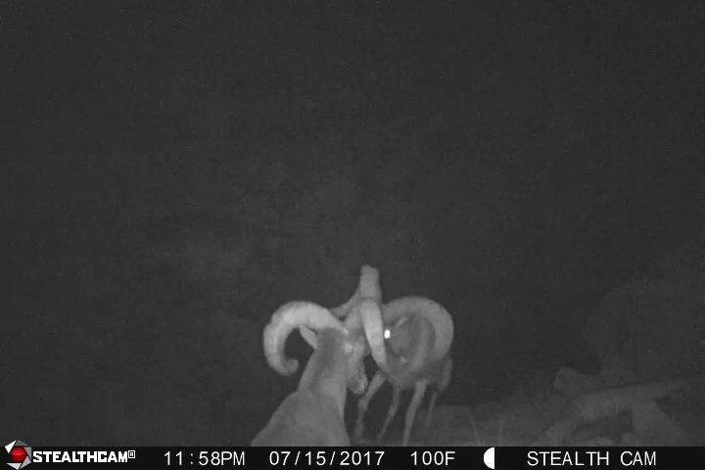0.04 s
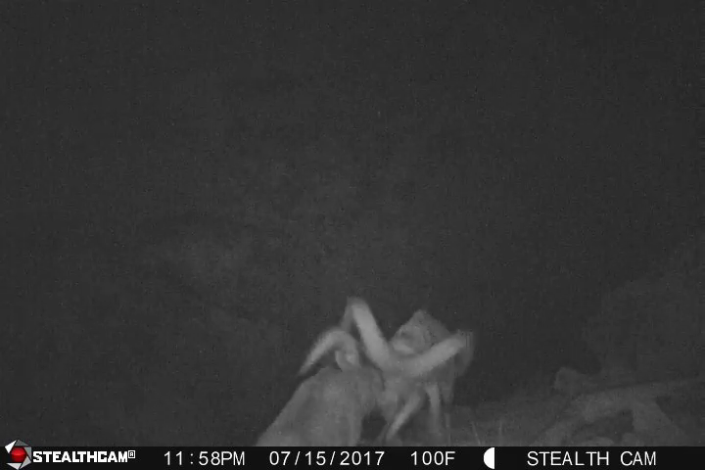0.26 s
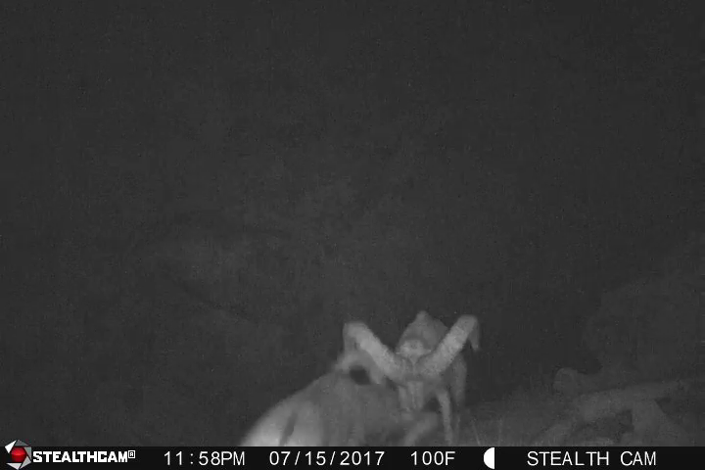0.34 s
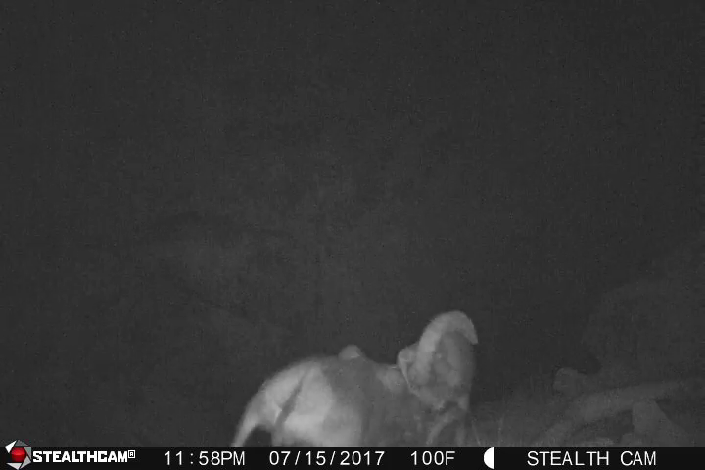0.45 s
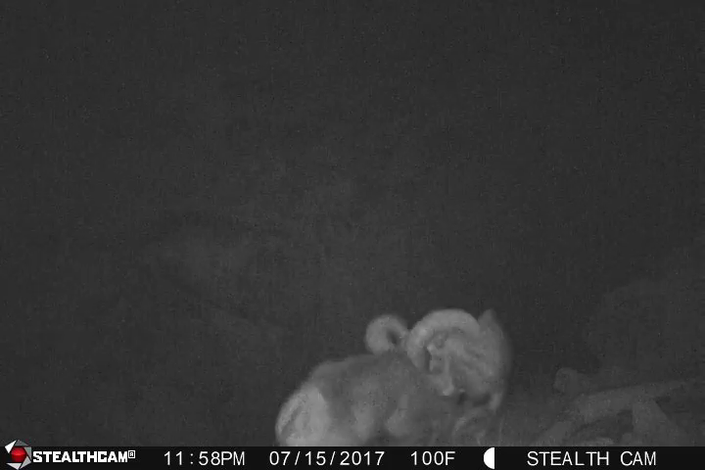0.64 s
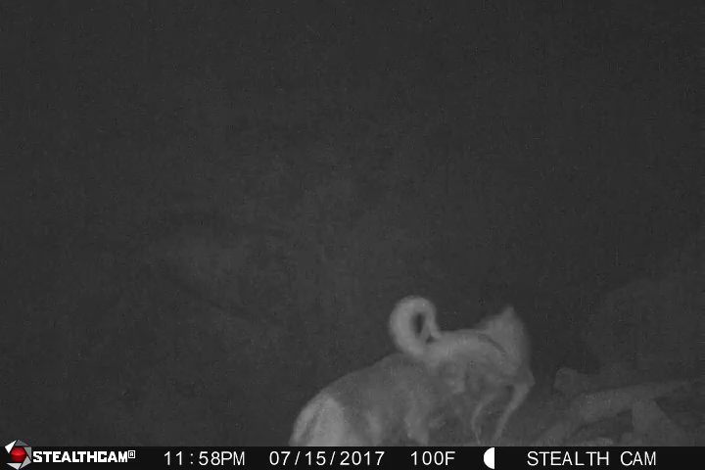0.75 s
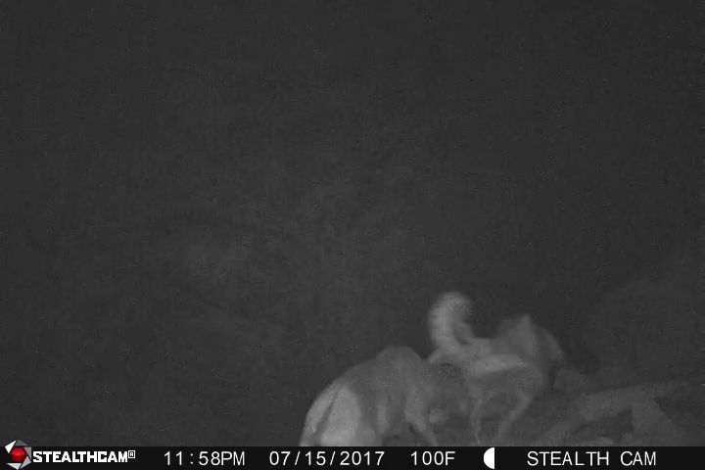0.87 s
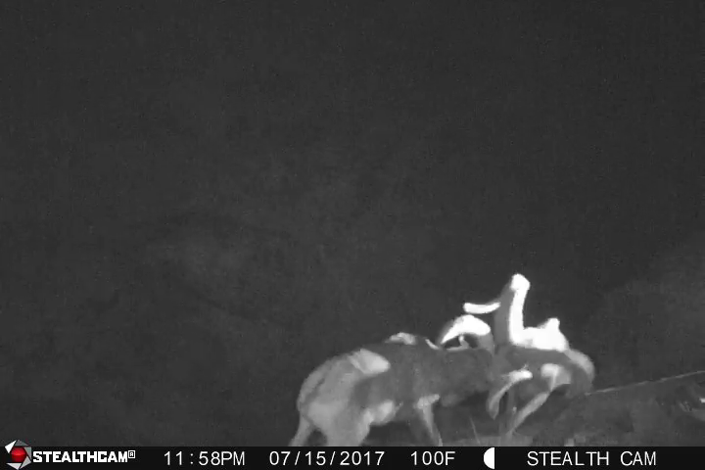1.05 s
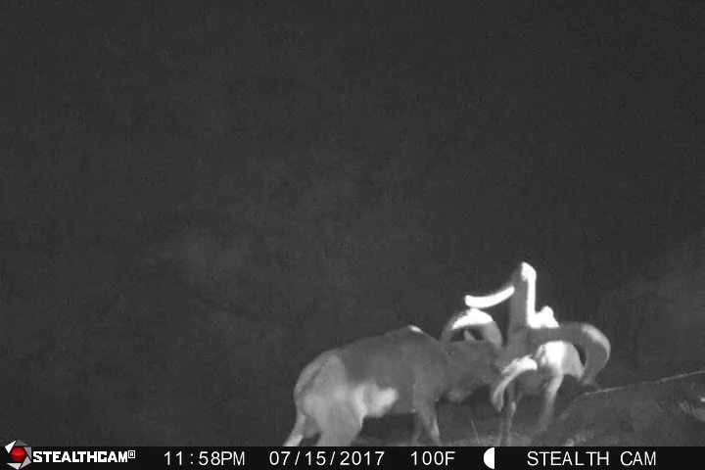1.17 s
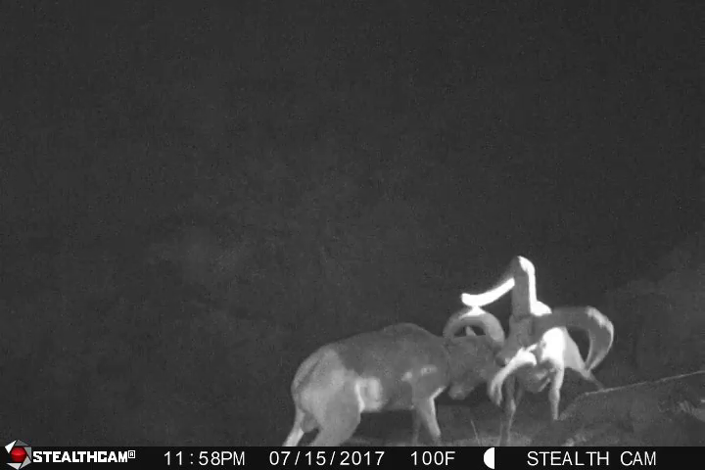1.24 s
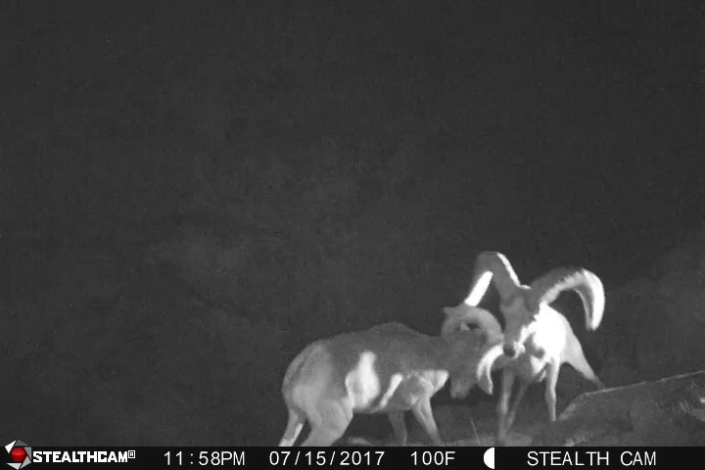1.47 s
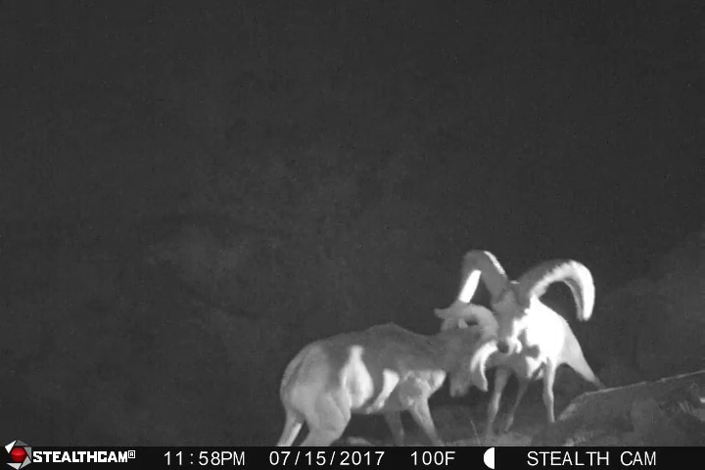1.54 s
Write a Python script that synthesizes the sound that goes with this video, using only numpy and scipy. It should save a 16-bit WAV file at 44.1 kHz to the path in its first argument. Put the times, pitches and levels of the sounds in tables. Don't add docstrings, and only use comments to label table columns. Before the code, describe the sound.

Two rams clash horns in a loud hollow double crack with quick weaker rebounds and a short rattling tail, then hooves knock and scrape on rocky ground; quiet night outdoors, small muffled, overloaded microphone.

```python
import sys
import numpy as np
from scipy import signal
from scipy.io import wavfile

SR = 44100
rng = np.random.default_rng(int(sys.argv[2]) if len(sys.argv) > 2 else 0)


def pcm_store(signal):
    levels = np.round(np.clip(np.atleast_2d(signal), -1, 1) * 32767)
    wavfile.write(sys.argv[1], SR, levels.astype(np.int16).T)


def nominal_scale(level):
    x = np.asarray(level, float) / 20
    return 10 ** x


N = 70560


def evened(x):
    return x / np.sqrt(np.mean(x ** 2) + 1e-20)


def add(mix, start_s, sound):
    part = mix[round(start_s * SR):][:len(sound)]
    part += sound[:len(part)]


def colour(x, points):
    hz, level_db = np.transpose(points)
    bins_hz = np.fft.rfftfreq(8192, 1 / SR)
    drawn_db = np.interp(np.log(bins_hz + 1), np.log(hz), np.maximum(level_db, -70))
    log_gain = np.log(nominal_scale(drawn_db))
    mirrored = np.concatenate([log_gain, log_gain[-2:0:-1]])
    taps = np.fft.ifft(np.exp(np.conj(signal.hilbert(mirrored)))).real[:4096]
    return evened(signal.fftconvolve(x, taps)[:len(x)])


def grit(per_s, spread_db, wash):
    strength = nominal_scale(spread_db * np.minimum(rng.exponential(1, N), 4))
    clicks = strength * rng.choice([-1., 1.], N) * (rng.random(N) < per_s / SR)
    return evened(clicks) + wash * rng.standard_normal(N)


def curve(rows):
    start_s, level_db = np.transpose(rows)
    return nominal_scale(np.interp(np.arange(N) / SR, start_s, level_db))


def ring(hz, t60, rise_s, phase=0., full=0.99):
    t = np.arange(round(SR * .6)) / SR
    rise = 1 - np.exp(-t / max(rise_s, 1e-5))
    fade = nominal_scale(-60 * (t / t60) ** full)
    return rise * fade * np.sin(2 * np.pi * hz * t + phase)


def band_noise(noise, low_hz, high_hz):
    return evened(signal.lfilter(*signal.butter(1, [low_hz, high_hz], "bandpass", fs=SR), noise))


def night_air():
    # pitch_hz [Hz], level_db [dB]
    night_spectrum = [(12, -35.5), (20, 2), (32, -26.5), (80, -17.5), (355, -34.5), (506, -34.5),
                      (687, -50.5), (2450, -46.5), (5600, -45), (7280, -80), (12300, -120)]
    return nominal_scale(-60) * colour(rng.standard_normal(N), night_spectrum)


def far_steps():
    out = np.zeros(N)
    # start_s [s], level_db [dB], pitch_hz [Hz]
    steps = [
        (0.929, -46, 131.7),
        (0.968, -45, 135),
        (1.01, -45.5, 145.6),
    ]
    for start_s, level_db, hz in steps:
        add(out, start_s, nominal_scale(level_db) * ring(hz, 0.19, 0.0072))
    return out


def trample():
    # pitch_hz [Hz], level_db [dB]
    ground_spectrum = [(24, -39), (40, -8.5), (152, -3.5), (348, -5.5), (626, -6), (745, -10), (982, -18.5),
                       (2500, -32), (3250, -59), (5500, -120)]
    # start_s [s], level_db [dB]
    weight = [(.07, -52), (.15, -61), (.2, -63.5), (.45, -57.5), (.555, -51.5), (.565, -37), (.63, -35),
              (.68, -40.5), (.7, -45.5), (.73, -45), (.75, -54), (.8, -57), (.82, -49), (.86, -50.5),
              (1.0, -57), (1.1, -66)]
    rows = [(0, -75)] + list(weight) + [(1.25, -80)]
    return colour(grit(per_s=1200, spread_db=4.5, wash=0.6), ground_spectrum) * curve(rows)


def gravel():
    # pitch_hz [Hz], level_db [dB]
    gravel_spectrum = [(59, -34), (100, -6), (398, -1.5), (781, -6.5), (1190, -6), (1780, -6.5),
                       (2040, -8.5), (5600, -13), (7280, -47.5), (12300, -120)]
    # start_s [s], level_db [dB]
    effort = [(0, -51.5), (.065, -51.5), (.2, -56.5), (.4, -51.5), (.52, -63), (.54, -43), (.72, -50),
              (.735, -57.5), (.795, -58.5), (.9, -43.5), (.92, -50.5), (1.1, -66), (1.29, -66.5),
              (1.305, -52), (1.32, -65.5), (1.44, -63.5), (1.565, -73.5), (1.575, -55)]
    # pitch_hz [Hz], level_db [dB], t60_s (time to fade by 60 dB) [s]
    slab = [(506, -48.5, 1.25), (410, -43, 0.6), (1500, -40.5, 0.37), (2700, -47.5, 0.49)]
    slide_s, slide_db, hold_s, slide_t60_s = .803, -31, .016, 0.13

    out = colour(grit(per_s=2500, spread_db=1.5, wash=0.6), gravel_spectrum) * curve(effort)
    t = np.arange(N) / SR - slide_s
    slide = (t > 0) * nominal_scale(slide_db - 60 * np.maximum(t - hold_s, 0) / slide_t60_s)
    sliding_grit = grit(per_s=5000, spread_db=-4.0, wash=0.52) * slide + 1e-9
    out += colour(sliding_grit, gravel_spectrum) * np.sqrt(np.mean(slide ** 2))
    for hz, level_db, t60 in slab:
        add(out, slide_s, nominal_scale(level_db) * ring(hz, t60, 0.0068))
    return out


def thuds():
    out = np.zeros(N)
    # start_s [s], level_db [dB], pitch_hz [Hz]
    stamps = [(.217, -12, 269.8), (0.2209, -16, 435), (.242, -17.5, 290), (.3, -24, 332), (0.223, -16, 135),
              (0.29, -29.5, 141.4), (0.722, -31, 88.5), (0.737, -32.5, 100), (0.745, -35, 111),
              (.760, -31, 84.5), (0.771, -37, 128), (0.81, -32.5, 83)]
    for start_s, level_db, hz in stamps:
        add(out, start_s, nominal_scale(level_db) * ring(hz, 0.057, 0.0014))
    return out


def stone_knocks():
    # start_s [s], level_db [dB], pitch_hz [Hz], t60_s [s]
    knocks = [(.002, -26.5, 905, 0.02), (.0068, -23.5, 842, 0.036), (.016, -33.5, 562, 0.035),
              (.023, -25.5, 985, 0.011), (0.038, -30.5, 800, 0.02), (0.0413, -21, 1214, 0.0071),
              (0.047, -18.5, 980, 0.017), (0.0545, -14, 936, 0.011), (.060, -28.5, 560, 0.014),
              (.108, -41, 460, .02), (.122, -37.5, 604, 0.017), (.14, -40.5, 560, .015),
              (0.091, -37.5, 1294, 0.017), (0.1597, -23.5, 2370, 0.007), (0.186, -31, 860, 0.015),
              (0.194, -37.5, 840, 0.0088), (0.501, -30.5, 3360, 0.015), (.526, -27.5, 2700, 0.0057),
              (.534, -30.5, 920, 0.0071), (0.5874, -21, 1420, 0.0081), (0.673, -32.5, 1180, 0.0093),
              (.8036, -25.5, 1230, .01), (0.8127, -23.5, 1500, 0.0087), (0.8153, -21, 2200, 0.01),
              (.824, -32, 920, 0.014), (.836, -31.5, 497, 0.01), (0.888, -43, 1540, 0.011),
              (0.8992, -26.5, 3040, 0.006), (.908, -36, 4800, .008), (.960, -36, 845, 0.032),
              (1.036, -41.5, 1605, 0.017), (1.098, -45.5, 2810, 0.014), (1.212, -46, 2035, 0.013),
              (1.275, -44, 1270, 0.022), (1.293, -36.5, 1710, 0.019), (1.300, -32.5, 2030, 0.011),
              (1.408, -52, 1200, .012), (1.425, -49.5, 849, .02), (1.44, -50, 1000, .015),
              (1.064, -46.5, 3200, .01), (.775, -40, 1100, .012), (1.433, -52, 900, .012),
              (1.47, -50, 1300, 0.014), (1.460, -36.5, 1297, 0.0085), (1.572, -45, 986, .02),
              (1.597, -38, 1500, 0.015)]
    tick_db, chatter_db, swing_db, after_db = -0.5, -15, 6, -15.5
    swing_cycles = 2.26
    out, t = np.zeros(N), np.arange(2000) / SR
    noise = rng.standard_normal((len(knocks), 2, len(t)))
    for (start_s, level_db, hz, t60), (tick_noise, chatter_noise) in zip(knocks, noise):
        bright = signal.lfilter(*signal.butter(1, 1500, "highpass", fs=SR), tick_noise)
        tick = nominal_scale(tick_db - 60 * t / 0.0053) * bright
        rough = band_noise(chatter_noise, hz * 0.33, min(hz * 4.5, 9000))
        chatter = nominal_scale(chatter_db - 60 * t / (3.6 * t60)) * rough
        swing = ring(hz, swing_cycles / hz, 0.0003, full=1.68)
        swing += nominal_scale(after_db) * ring(hz, 1.2 * t60, 0.0013)
        add(out, start_s, nominal_scale(level_db) * (tick + chatter - nominal_scale(swing_db) * swing[:len(t)]))
    return signal.lfilter(*signal.butter(2, 300, "highpass", fs=SR), out)


def hillside_rattle(start_s):
    # pitch_hz [Hz], level_db [dB]
    rattle_spectrum = [(24, -52), (40, 0.5), (205, -6.5), (680, 1), (1160, -10.5), (1590, -14.5),
                       (1830, -23.5), (2080, -16.5), (5600, -42), (7280, -66.5), (12300, -120)]
    rattle_db, rattle_t60_s, rise_s = -16, 0.46, 0.0046
    out, t = np.zeros(N), np.arange(N) / SR
    rattle = colour(grit(per_s=2800, spread_db=5, wash=0.46), rattle_spectrum)
    add(out, start_s, rattle * nominal_scale(rattle_db - 60 * t / rattle_t60_s) * np.minimum(t / rise_s, 1) ** 2)
    return out


def snaps():
    # start_s [s], level_db [dB], pitch_hz [Hz], t60_s [s]
    cracks = [(0.22, 1.5, 5040, 0.016), (0.2378, -10.5, 1530, 0.018), (0.2464, -13, 3000, 0.0089),
              (0.2927, -14.5, 1560, 0.035), (0.3551, -17, 1553, 0.023), (0.23, -14.5, 1930, 0.016),
              (0.57, -34.5, 5050, 0.018), (1.299, -42, 4830, 0.013), (1.3, -45.5, 800, 0.046),
              (0.53, -37, 4900, .012), (.549, -36.5, 4400, .012), (.56, -34.5, 2100, 0.016),
              (0.58, -42, 4720, 0.0089), (.6, -46, 4900, .008), (0.69, -38, 5700, 0.0088),
              (.631, -38, 2800, .01), (0.71, -39, 1560, 0.013), (.292, -20.5, 2080, 0.034),
              (0.89, -30, 5300, 0.0078), (.2242, -15, 3700, 0.011), (.2415, -13.5, 1900, .014),
              (0.25, -16, 4500, .01), (1.383, -53, 4800, 0.0074), (1.281, -47, 2370, 0.014)]
    out, t = np.zeros(N), np.arange(4000) / SR
    noise = rng.standard_normal((len(cracks), len(t)))
    for (start_s, level_db, hz, t60), hiss in zip(cracks, noise):
        fuzz = band_noise(hiss, hz * 0.55, hz * 0.65) * nominal_scale(-45 * t / t60)
        tone = ring(hz, t60, 0.00035)[:len(t)]
        add(out, start_s, nominal_scale(level_db) * (tone + 0.52 * fuzz))
    return out


def horns():
    # start_s [s], level_db [dB], pitch_hz [Hz], t60_s [s], overtones_db [dB]
    blows = [(.2165, 7.5, 588, 0.013, -27), (.2232, -3.5, 722, 0.0097, -13), (.2281, -8.5, 364, .018, -23),
             (.2379, 1, 629, 0.017, -17), (.2427, -0.5, 734, .027, -21), (.2572, -18, 570, 0.013, -20),
             (.2605, -9, 667, 0.02, -18), (.2742, -12, 542, .012, -12.5), (.2927, -14.5, 757, .012, -14),
             (.2974, -13, 690, 0.022, -14), (.304, -19.5, 523, .016, -17), (.311, -22.5, 623, 0.016, -13.5),
             (.319, -19, 567, 0.013, -21), (.33, -27, 650, 0.026, -18), (.341, -26.5, 666.7, 0.065, -21),
             (.3535, -24, 655, 0.018, -23), (.400, -26, 673, 0.026, -16.5), (.488, -36, 678, 0.033, -12.5),
             (.612, -31, 625, 0.017, -28), (0.627, -30, 933, 0.012, -18), (.646, -33, 640, 0.02, -30),
             (.654, -28, 670, 0.017, -30), (.718, -38.5, 713, 0.018, -5.5)]
    # multiple [times the pitch], level_db [dB], t60_s [s]
    overtones = [(1.5, 2, 0.074), (2.05, 5, 0.019), (2.3, 5, 0.054), (2.9, 3.5, 0.013), (3.9, -4, 0.018),
                 (4.5, -14.5, 0.034), (6, -19, 0.01), (7.1, -11.5, .02)]
    splinter_db, splinter_t60_s = 0, 0.058
    out, t = np.zeros(N), np.arange(4000) / SR
    luck = rng.random((len(blows), len(overtones), 2))
    noise = rng.standard_normal((len(blows), len(t)))
    for (start_s, level_db, hz, t60, over_db), draws, hiss in zip(blows, luck, noise):
        body = ring(hz, t60, .001, full=1.8)
        bright = 0
        for (multiple, tone_db, tone_t60), (detune, turn) in zip(overtones, draws):
            tone_hz = hz * multiple * (.94 + .12 * detune)
            bright = bright + nominal_scale(tone_db) * ring(tone_hz, tone_t60, 0.00018, 2 * np.pi * turn)
        add(out, start_s, nominal_scale(level_db) * (body + nominal_scale(over_db - 5.5) * bright))
        splinter_fade = nominal_scale(level_db + over_db + splinter_db - 60 * t / splinter_t60_s)
        add(out, start_s, splinter_fade * band_noise(hiss, 900, 4000))
    return out + snaps() + hillside_rattle(blows[0][0])


def scene():
    background = night_air() + far_steps()
    hooves = trample() + gravel() + thuds() + stone_knocks()
    return (background + hooves + horns())[None]


def band_limit(x):
    return signal.sosfilt(signal.butter(12, 16480, fs=SR, output="sos"), x)


def record(dry):
    # pitch_hz [Hz], level_db [dB]
    mic = [
        (3600, -7),
        (4900, 0.5),
        (5500, -7.5),
    ]
    preamp_limit, final_limit, offset = 0.74, .72, .0067
    hz, level_db = np.transpose([(0, 0.017), (2500, 0.0058)] + list(mic) + [(SR / 2, 0)])
    edge = signal.firwin(401, 5900, window=("kaiser", 10), fs=SR)
    taps = np.convolve(edge, signal.firwin2(101, hz, nominal_scale(level_db), fs=SR))
    heard = signal.oaconvolve(dry, taps[None], "same")
    overloaded = np.clip(heard, -preamp_limit, preamp_limit)
    narrow = signal.oaconvolve(overloaded, edge[None], "same")
    clipped = np.clip(narrow + offset, -final_limit, final_limit)
    top = signal.firwin(101, 15800, fs=SR)
    return band_limit(signal.oaconvolve(clipped, top[None], "same"))


dry = scene()
out = record(dry)
pcm_store(out)
```